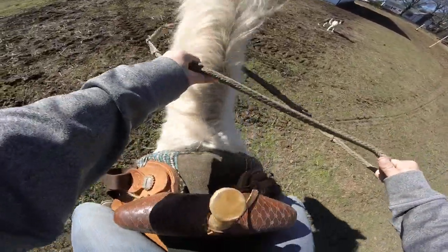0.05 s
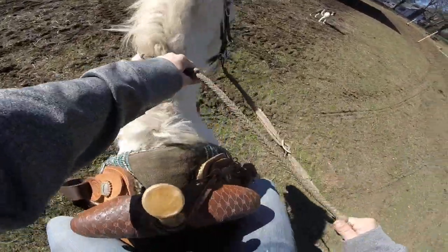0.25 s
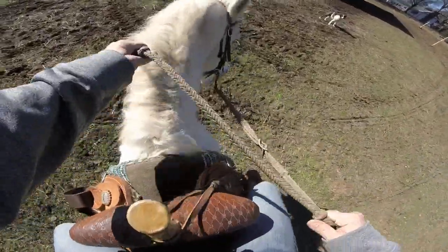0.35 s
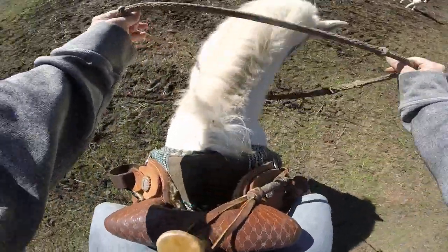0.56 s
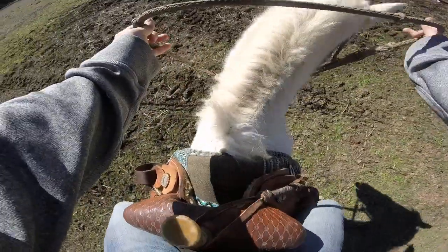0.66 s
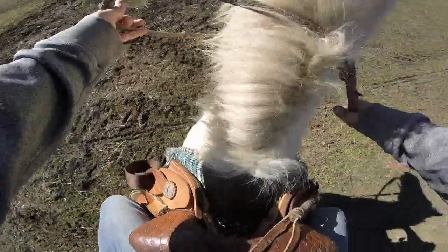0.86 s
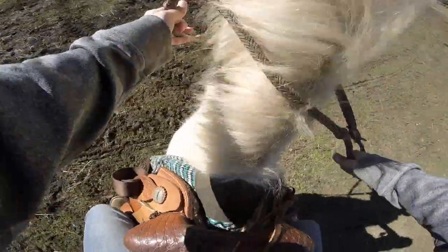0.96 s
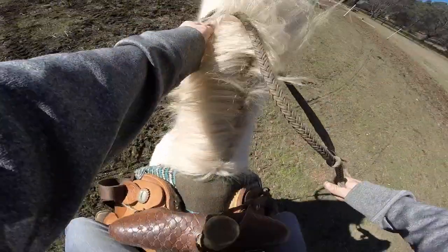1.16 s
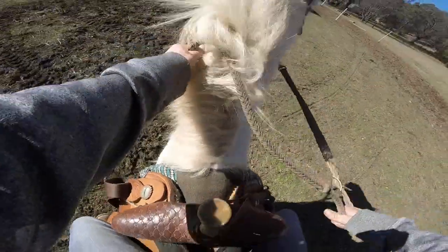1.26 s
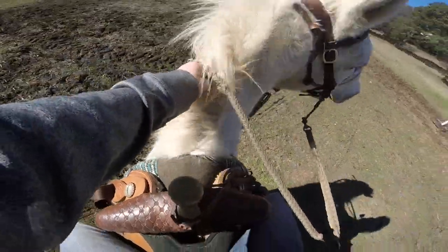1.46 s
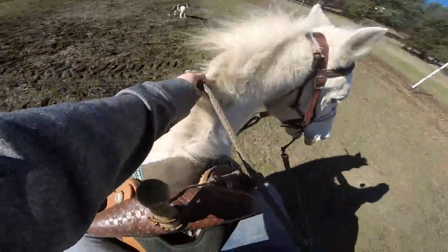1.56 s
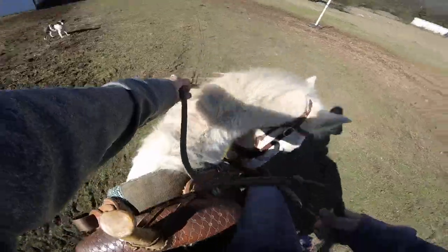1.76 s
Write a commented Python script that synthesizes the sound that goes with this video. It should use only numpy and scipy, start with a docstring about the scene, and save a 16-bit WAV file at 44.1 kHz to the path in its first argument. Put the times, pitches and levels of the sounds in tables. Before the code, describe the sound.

Sharp, irregular knocks come from a body-worn camera jolted as a rider turns a horse on a muddy field. Tack ticks, reins scrape faintly and soft hoof thuds join midway, over low wind rumble and hiss.

```python
"""A muddy field, where a rider turns a horse, heard from a camera worn on the body.
Each jolt of the steps excites the damped modes of the camera's case, which rings briefly.
The tack ticks as tension is released, rein and sleeve scrape by stick-slip friction, and the hooves
thud in soft ground. Beneath lie a slow sway of pressure, a rumble of moving air and a faint hiss."""
import sys
import numpy as np
from scipy import signal
from scipy.fft import rfft, irfft
from scipy.io import wavfile

SR = 44100
rng = np.random.default_rng(int(sys.argv[2]) if len(sys.argv) > 2 else 0)


def output_pcm(signal):
    """Save a mono or channel-first signal as 16-bit PCM at the path in sys.argv[1].

    Samples are clipped to [-1, 1] before scaling.
    """
    pcm = np.clip(np.atleast_2d(signal).T, -1, 1) * 32767
    wavfile.write(sys.argv[1], SR, np.round(pcm).astype(np.int16))


N = 79380
TIME = np.arange(N) / SR
EVENT_TIME = np.arange(8192) / SR


def amp(db):
    """Amplitude ratio of a level in decibels."""
    return 10 ** (np.asarray(db) / 20)


def unit(x):
    """Normalisation to rms 1."""
    return x / np.sqrt(np.mean(x ** 2) + 1e-20)


def add(mix, start, sound):
    """Superposition of a sound on the mix, from a start time in seconds."""
    part = mix[max(round(start * SR), 0):][:len(sound)]
    part += sound[:len(part)]


def decay(t60):
    """Exponential decay by 60 dB in t60 seconds."""
    return np.exp(-np.log(1000) * EVENT_TIME / t60)


def damped_sine(hz, t60):
    """Free vibration of a damped oscillator."""
    return decay(t60) * np.sin(2 * np.pi * hz * EVENT_TIME)


def rough_impulse(noise_db, rise_t60, fall_t60):
    """Excitation: a unit impulse, then a noise burst whose energy is noise_db relative to it."""
    noise = rng.standard_normal(len(EVENT_TIME)) * (decay(fall_t60) - decay(rise_t60))
    force = amp(noise_db) * noise / np.linalg.norm(noise)
    force[0] += 1
    return force


def soften(x, cutoff_hz):
    """Two-pole low-pass: a softer contact drives fewer high frequencies."""
    return signal.sosfilt(signal.butter(2, cutoff_hz, fs=SR, output="sos"), x)


def colour(x, spectrum):
    """Spectral shaping by (f/Hz, level/dB) points, at rms 1."""
    hz, db = np.transpose(spectrum)
    bins = np.fft.rfftfreq(len(x), 1 / SR)
    gain = amp(np.interp(np.log(bins + 1), np.log(hz + 1), db))
    return unit(irfft(rfft(x) * gain, len(x)))


def drift(rate_hz):
    """Slow random fluctuation: low-passed noise at rms 1."""
    bins = np.fft.rfftfreq(N, 1 / SR)
    lowpass = np.exp(-(bins / rate_hz) ** 2) * (bins > 0)
    return unit(irfft(rfft(rng.standard_normal(N)) * lowpass, N))


# Impacts on the case: t/s, level/dB, contact cutoff f/Hz; relative push/dB, low modes/dB, rebound/dB
CASE_IMPACTS = [(0.0423, -32, 1400, 1, -2, -35), (0.084, -43, 560, 6, -17, -29),
                (0.212, -23, 1730, -1, -4.5, -14), (0.382, -30, 1740, -7, -3.5, -35),
                (0.6151, -23, 1400, -8, -7.5, -15.5), (0.6412, -32.5, 1160, 8, -1.5, -17),
                (0.668, -39, 1600, -18, 0, -22), (0.736, -38.5, 3430, -25, -8, -27),
                (0.8036, -22, 6760, -1, -2, -28), (0.9245, -29, 1770, -0.5, -4.5, -10),
                (0.958, -31.5, 2200, 2.5, -3.5, 2.5), (1.0159, -26, 1900, -33, -2.5, -16),
                (1.0718, -28.5, 1650, 1.5, -7, -20), (1.148, -44, 704, -13, 3, -25),
                (1.555, -33, 1180, -7, 6, 1.5), (1.571, -32, 1810, 1, -5, -11),
                (1.616, -41, 2500, 8.5, -20, -9)]


def case_knocks():
    """Impact excitation: each jolt rings and pushes the case, which chatters and rebounds once."""
    rebound_delay_s = 0.0063
    thin_tap = signal.iirpeak(2040, Q=3.8, fs=SR)  # the case drops back into its mount
    out = np.zeros(N)
    for start, db, cutoff_hz, push_db, low_db, rebound_db in CASE_IMPACTS:
        contact = rough_impulse(noise_db=-18, rise_t60=0.0125, fall_t60=0.025)
        ring = case_ring(low_db)
        push = amp(push_db) * damped_sine(hz=184, t60=0.0098)
        knock = soften(signal.fftconvolve(contact, ring + push), cutoff_hz)
        add(out, start, amp(db) * knock)
        add(out, start + rebound_delay_s, amp(db + rebound_db) * signal.lfilter(*thin_tap, ring))
    return out


# Modes of the case: f/Hz, relative level/dB, t60/s
CASE_MODES = [(483.6, 3.5, 0.015), (839, -16, 0.06), (1447, -7, 0.027), (1527, -8.5, 0.023),
              (2038, -8, 0.019), (2624, -4, .01), (2994, -4, 0.0048), (3250, -8, 0.011),
              (3625, -11.5, 0.016), (4000, -11.5, 0.011), (5230, -9.5, 0.0089), (5670, -16.5, 0.0091),
              (6980, -14, 0.0055), (7360, -12.5, 0.0064), (8900, -26, 0.01), (10900, -22, 0.0063)]


def case_ring(low_db):
    """Modal superposition: the point of impact sets the share of the modes below 1 kHz."""
    build_cycles, scatter_db = 0.47, 0.6
    ring = np.zeros(len(EVENT_TIME))
    for hz, db, t60 in CASE_MODES:
        gain = amp(db + scatter_db * rng.standard_normal() + low_db * (hz < 1000))
        build_up = 1 - np.exp(-hz * EVENT_TIME / build_cycles)
        ring += gain * build_up * damped_sine(hz, t60)
    return ring


# Snaps of the tack: t/s, level/dB, resonance f/Hz, quality factor Q
TACK_SNAPS = [(0.278, -60, 7800, 4.5), (0.402, -56.5, 5500, 5.7), (0.5698, -47, 4000, 2.4),
              (0.735, -55, 5800, 3.4), (0.869, -47.5, 2800, 3.8), (0.94, -42.5, 2660, 1.6),
              (0.9668, -33.5, 2720, 2.6), (0.973, -43, 3560, 1.5), (0.985, -39.5, 3020, 2.8),
              (0.9885, -57, 2600, 3.2), (1.131, -51.5, 2740, 3.7), (1.442, -50, 6160, 12),
              (1.492, -45.5, 2790, 3.4), (1.556, -34, 2780, 3.8), (1.6149, -47, 3500, 1.3),
              (1.764, -50.5, 4060, 9.2)]


def tack_ticks():
    """Sudden release: leather and buckles let go, driving a resonance with a snap and a fibre crunch."""
    t60 = 0.01
    out = np.zeros(N)
    for start, db, hz, q in TACK_SNAPS:
        release = rough_impulse(noise_db=6, rise_t60=t60 / 10, fall_t60=t60)
        resonance = signal.lfilter(*signal.iirpeak(hz, q, SR), release)
        snap = soften(resonance, 2 * hz)
        snap *= np.linalg.norm(decay(t60)) / np.linalg.norm(snap)  # equal energy at any f and Q
        add(out, start, amp(db) * snap)
    return out


# Hoof landings: t/s, level/dB, f/Hz
HOOF_FALLS = [(0.58, -49, 40), (0.672, -44, 55), (0.9901, -26, 107), (1.068, -38, 71)]


def hoof_thuds():
    """Heavy damping: a hoof landing in soft ground gives only a cycle or two of bass."""
    rise_s, t60_cycles = 0.0031, 2.4
    onset = np.minimum(EVENT_TIME / rise_s, 1)
    out = np.zeros(N)
    for start, db, hz in HOOF_FALLS:
        add(out, start, amp(db) * onset * damped_sine(hz, t60_cycles / hz))
    return out


# Strokes of rein on sleeve: centre t/s, half-width t/s, level/dB
REIN_STROKES = [(0.615, 0.076, -55), (0.806, 0.045, -55), (0.977, 0.046, -50), (0.991, 0.0061, -49.5),
                (1.239, 0.023, -56)]
# Spectrum of the friction: f/Hz, relative level/dB
FRICTION_SPECTRUM = [(100, 9.5), (500, -2), (1000, -11), (1400, 5.5), (1750, -4), (2500, -4.5), (3500, -8),
                     (4600, -19), (5300, -10), (6200, -38), (7400, -18.5), (14000, -71)]


def rein_scrapes():
    """Stick-slip friction: rope slides over cloth in dense tiny slips that swell and fade."""
    slips_per_s, spread_db = 2900, 5.5
    slips = (rng.random(N) < slips_per_s / SR) * rng.choice([-1, 1], N)
    strength = amp(spread_db * np.minimum(rng.exponential(1, N), 3))
    envelope = sum(amp(db) * np.exp(-((TIME - centre) / half) ** 2) for centre, half, db in REIN_STROKES)
    return envelope * colour(slips * strength, FRICTION_SPECTRUM)


# Envelope of the sway: t/s, relative level/dB
SWAY_ENVELOPE = [(0.0, -44), (0.024, -47), (0.896, -38.5), (1.082, -26.5), (1.138, -42), (1.624, -36.5),
                 (1.664, -48), (1.764, -47), (1.8, -54)]


def body_sway():
    """Air displacement: the swaying body pumps a mostly infrasonic pressure wave at the microphone."""
    mean_hz, wander, gain_db = 14, 0.227, 1
    cycles = np.cumsum(mean_hz * (1 + wander * drift(rate_hz=6.1))) / SR
    envelope = amp(gain_db + np.interp(TIME, *np.transpose(SWAY_ENVELOPE)))
    return envelope * np.sqrt(2) * np.sin(2 * np.pi * cycles)


# Envelope of the rumble: t/s, relative level/dB
RUMBLE_ENVELOPE = [(0.0, -57), (0.54, -57.5), (0.59, -47.5), (0.906, -51.5), (1.088, -45), (1.118, -54.5),
                   (1.628, -54), (1.674, -56), (1.8, -63)]
# Spectrum of the rumble: f/Hz, relative level/dB
RUMBLE_SPECTRUM = [(12, -10.5), (22, -20), (35, 6.5), (60, 2), (120, -18.5), (250, -22), (600, -69)]


def air_rumble():
    """Random pressure fluctuation: moving air makes low-frequency noise that swells and sinks."""
    gain_db = 0.5
    envelope = amp(gain_db + np.interp(TIME, *np.transpose(RUMBLE_ENVELOPE)))
    return envelope * colour(rng.standard_normal(N), RUMBLE_SPECTRUM)


# Spectrum of the hiss: f/Hz, relative level/dB
HISS_SPECTRUM = [(59, -13), (100, 3), (118, 1.5), (227, -2), (359, -4), (546, -5), (607, -5), (1110, -12.5),
                 (1460, -5), (1700, -12), (2000, -14), (2580, -13.5), (3050, -18), (3840, -18),
                 (4640, -22.5), (6220, -24.5), (15000, -39.5)]


def outdoor_hiss():
    """Spectral colouration: the case makes the ambient noise hollow; its level flutters slightly."""
    level_db, flutter_db = -55, 1.08
    envelope = amp(level_db + flutter_db * drift(rate_hz=20))
    return envelope * colour(rng.standard_normal(N), HISS_SPECTRUM)


def scene():
    """Linear superposition: the pressures of all sources add at one microphone."""
    contacts = case_knocks() + tack_ticks() + hoof_thuds() + rein_scrapes()
    return (contacts + body_sway() + air_rumble() + outdoor_hiss())[None]


def record(dry):
    """Band limiting: the camera's linear-phase low-pass removes the highest treble."""
    lowpass = signal.firwin(511, cutoff=15150, window=("kaiser", 9), fs=SR)
    return signal.oaconvolve(dry, lowpass[None], "same")


dry = scene()
out = record(dry)
output_pcm(out)
```